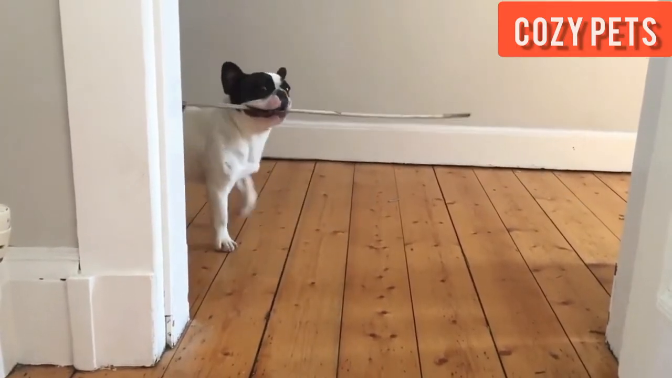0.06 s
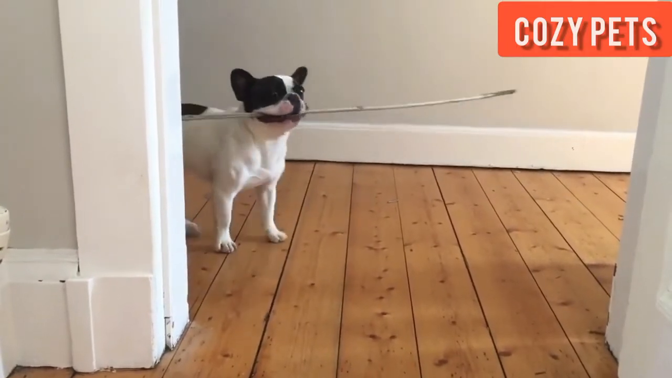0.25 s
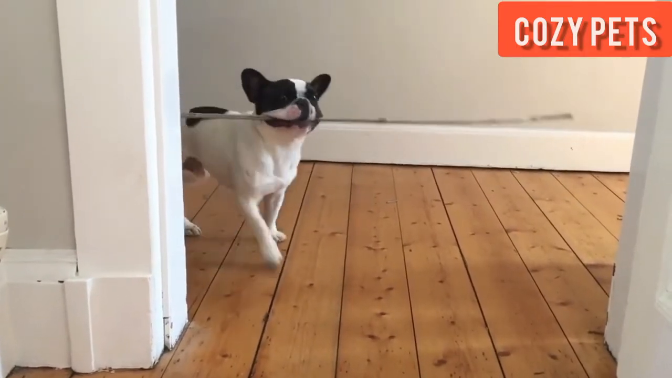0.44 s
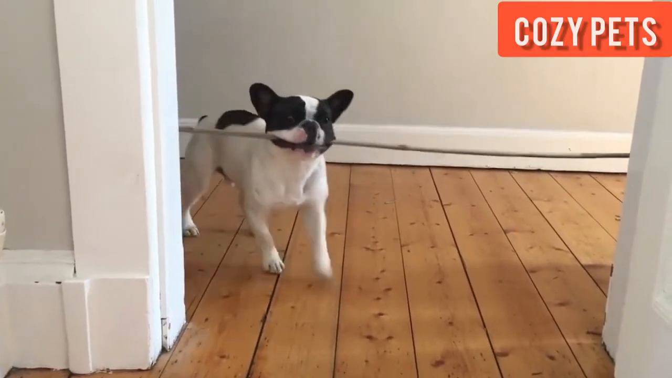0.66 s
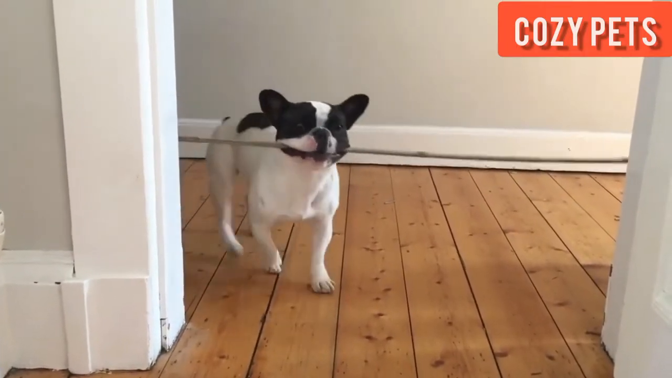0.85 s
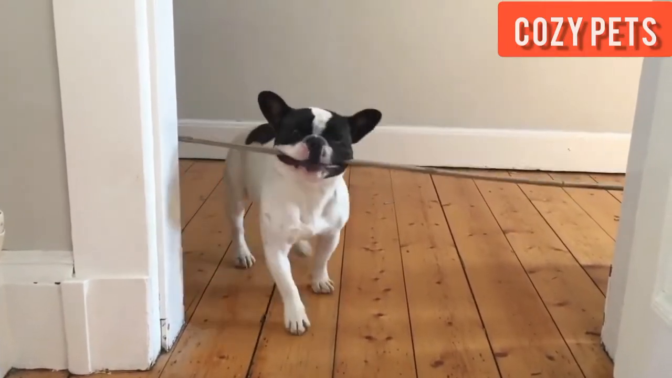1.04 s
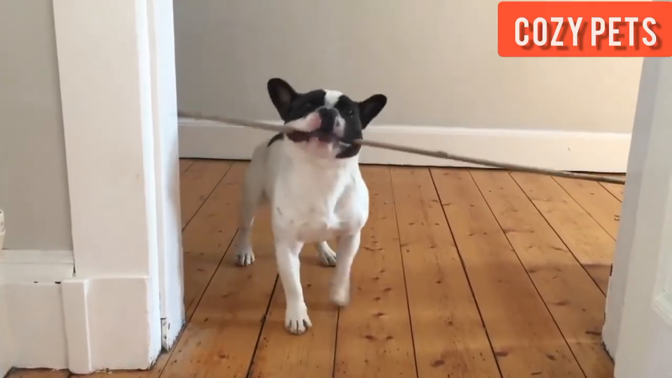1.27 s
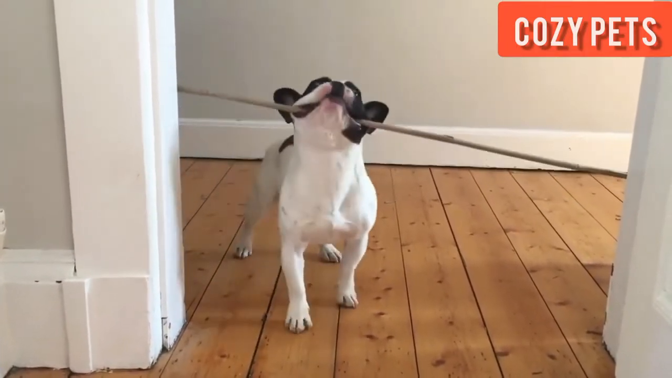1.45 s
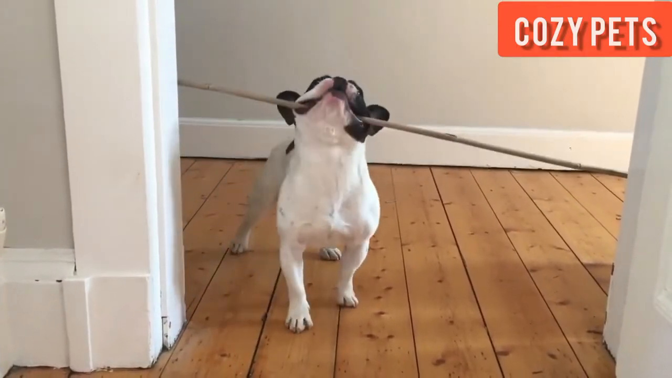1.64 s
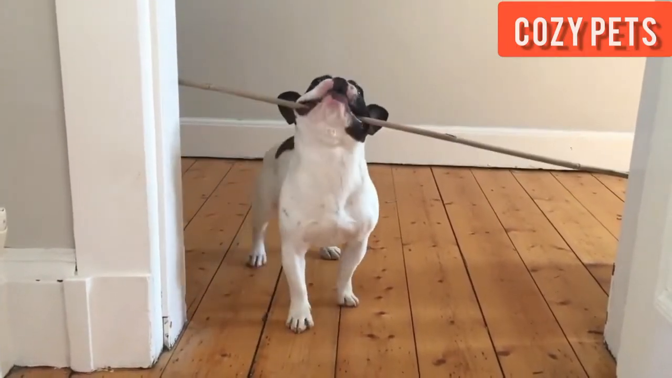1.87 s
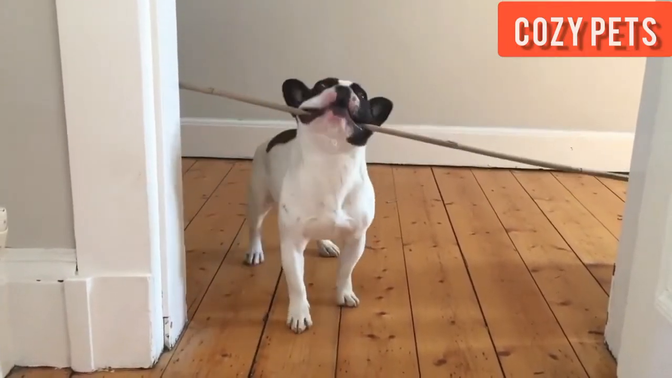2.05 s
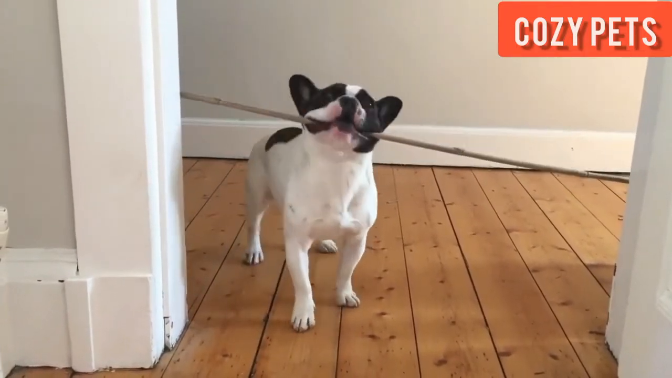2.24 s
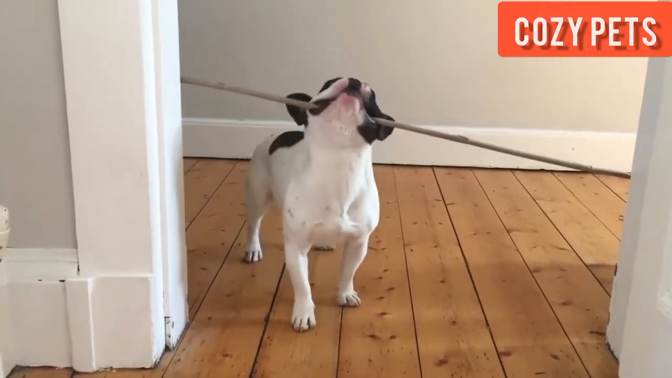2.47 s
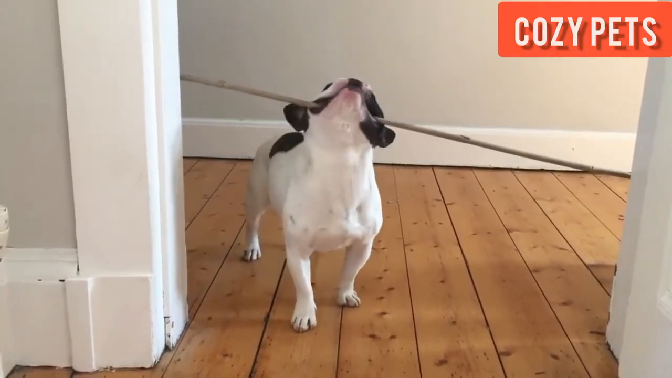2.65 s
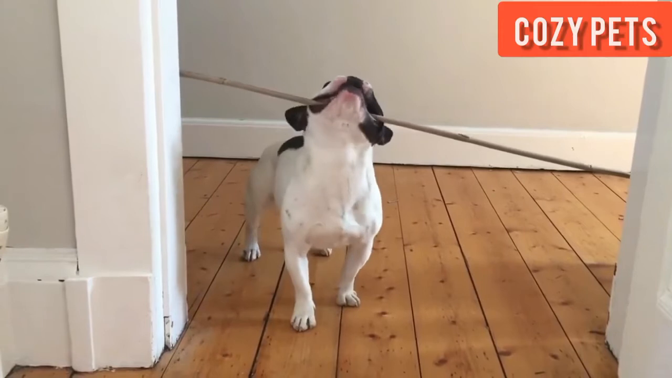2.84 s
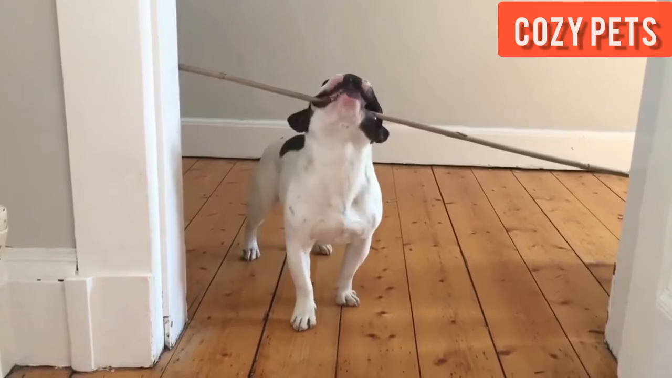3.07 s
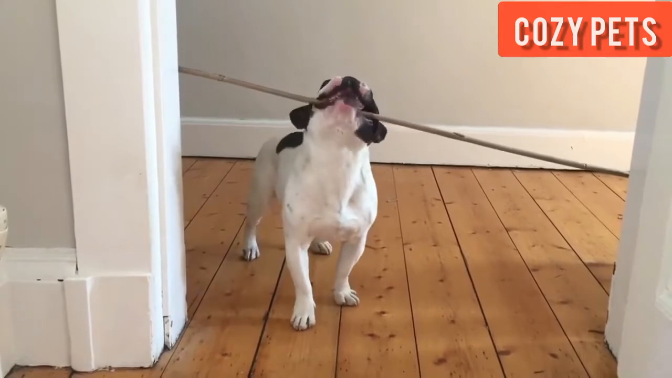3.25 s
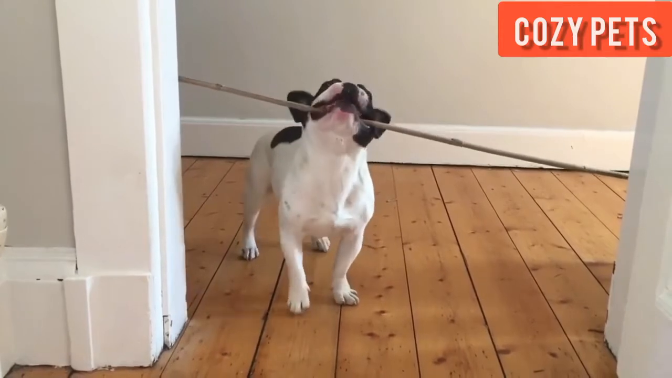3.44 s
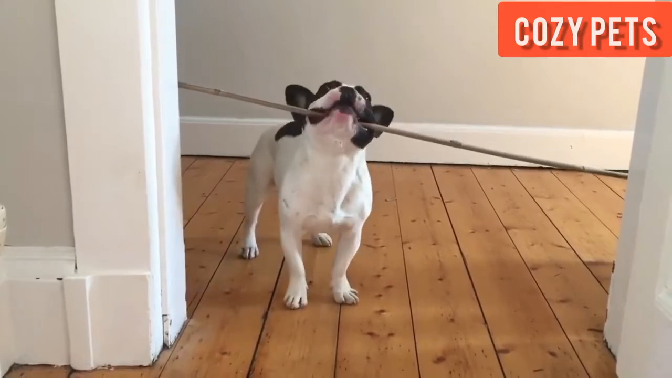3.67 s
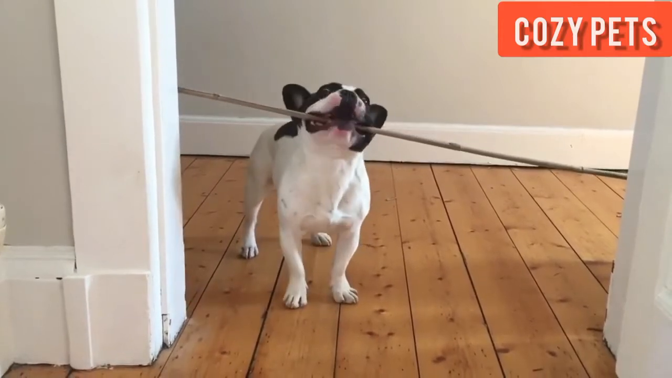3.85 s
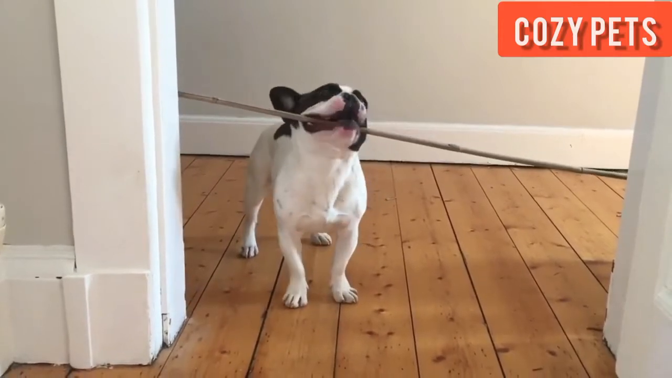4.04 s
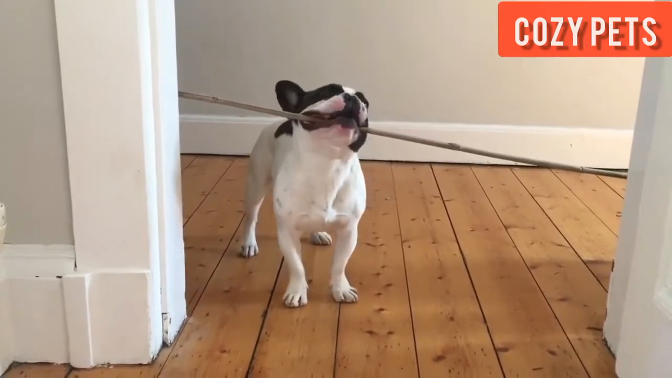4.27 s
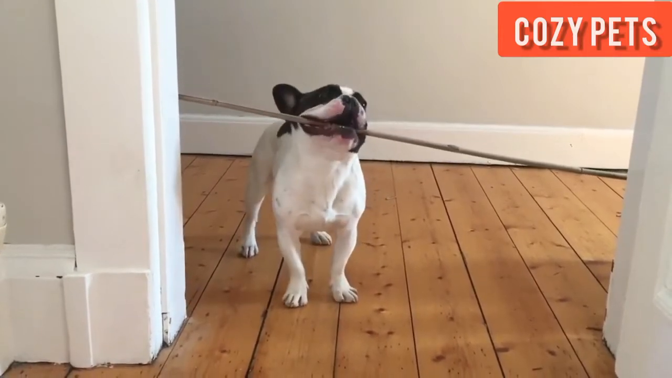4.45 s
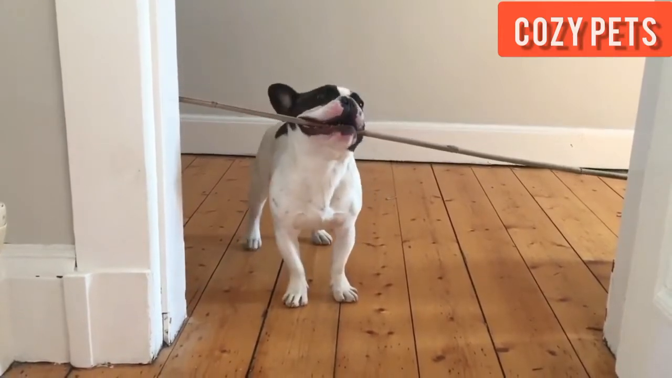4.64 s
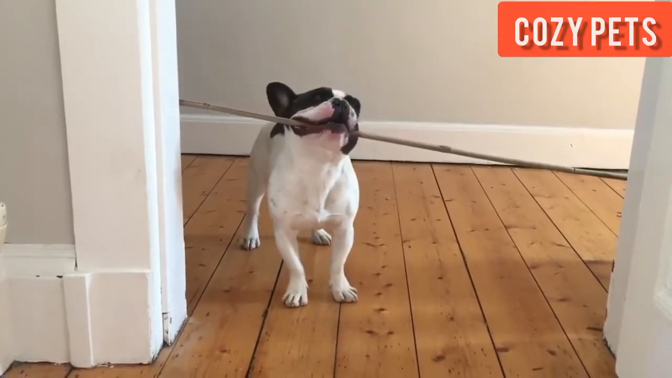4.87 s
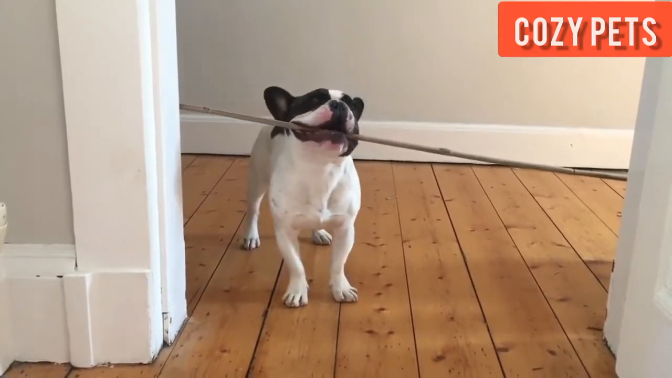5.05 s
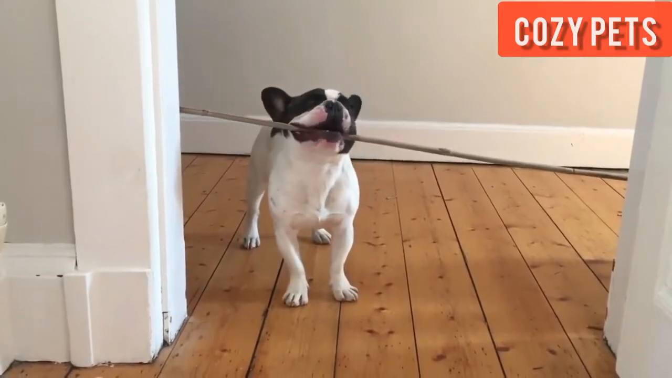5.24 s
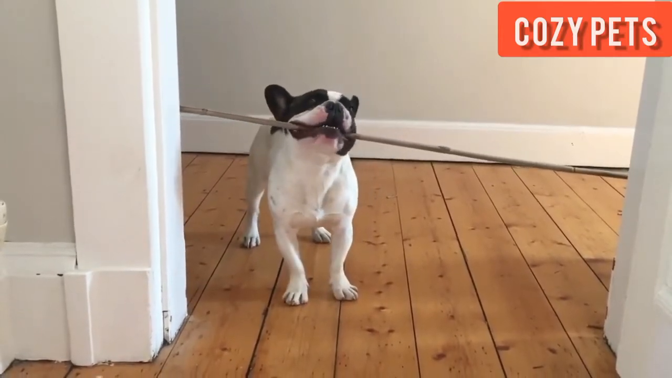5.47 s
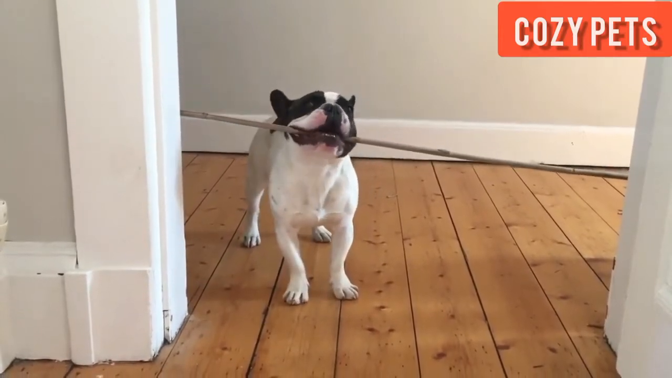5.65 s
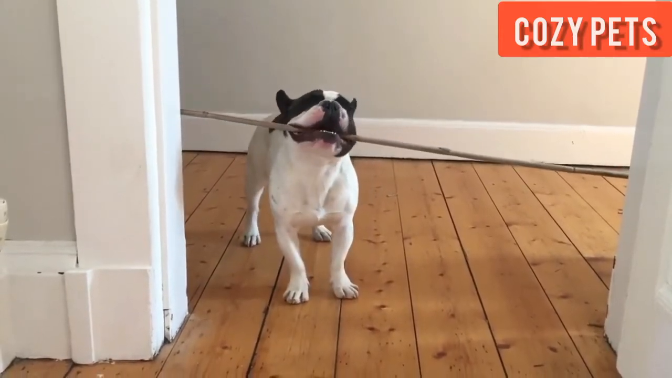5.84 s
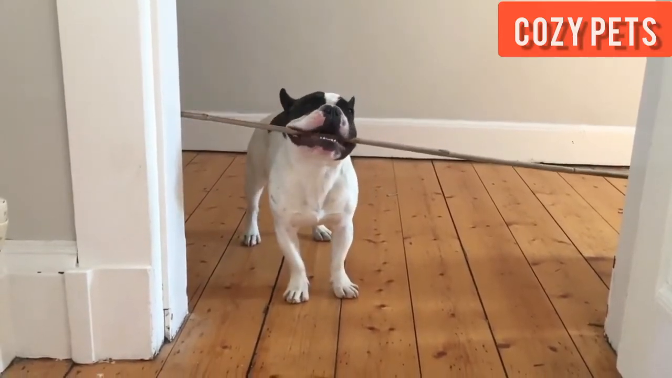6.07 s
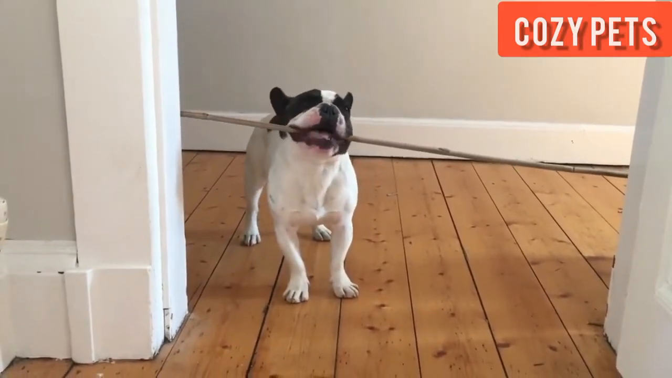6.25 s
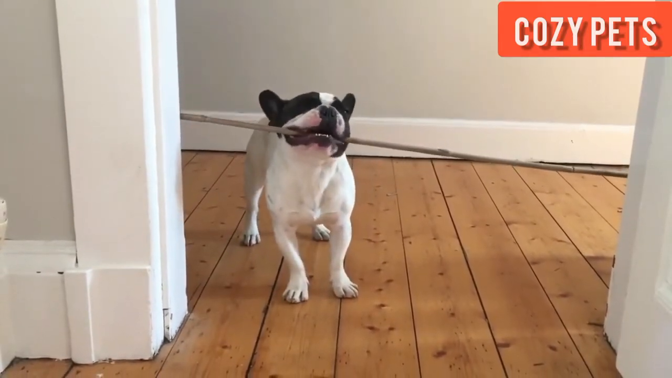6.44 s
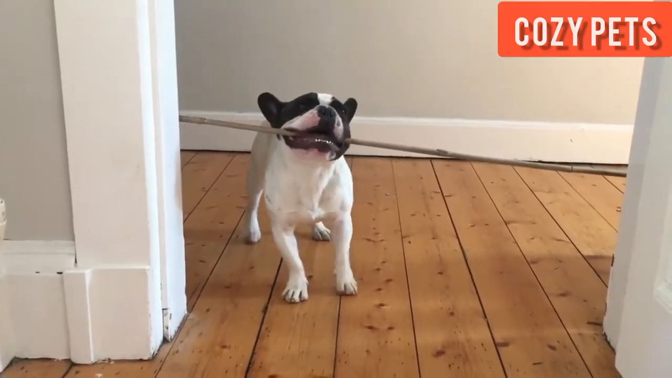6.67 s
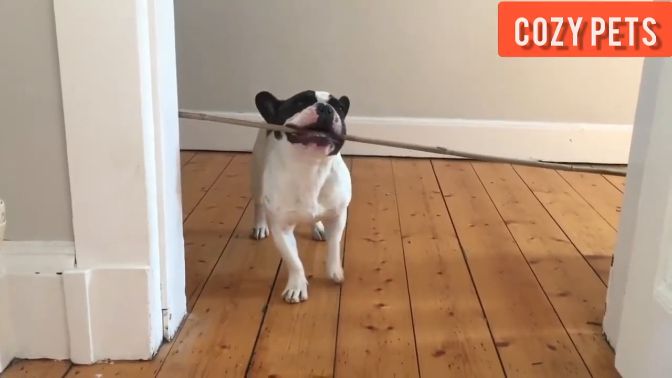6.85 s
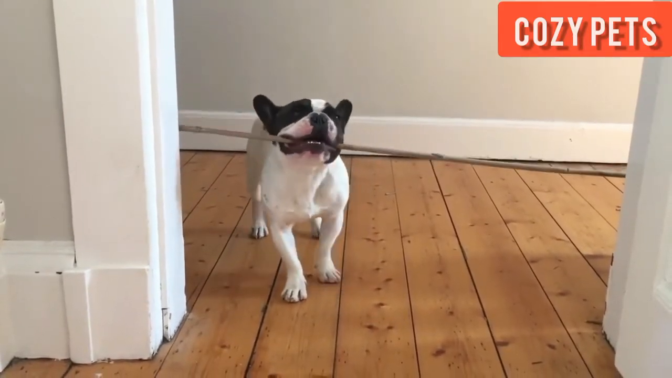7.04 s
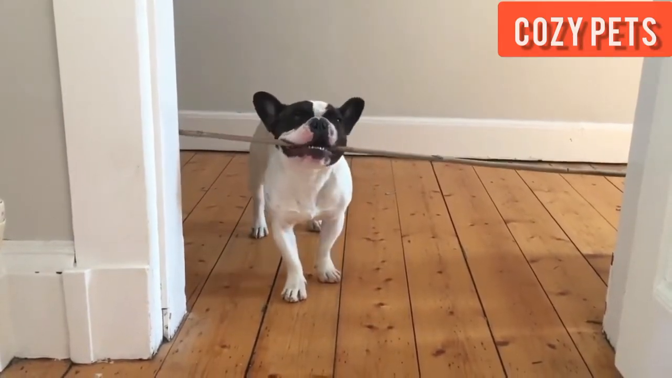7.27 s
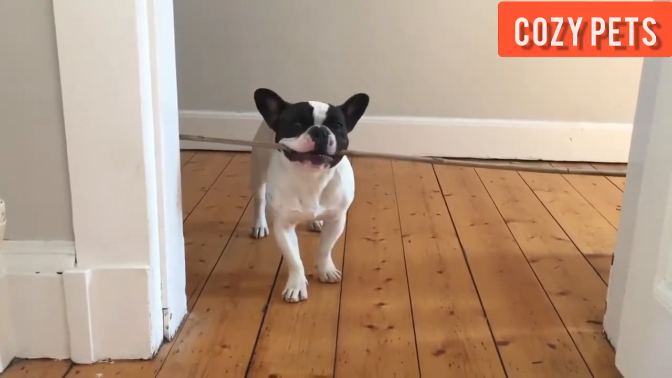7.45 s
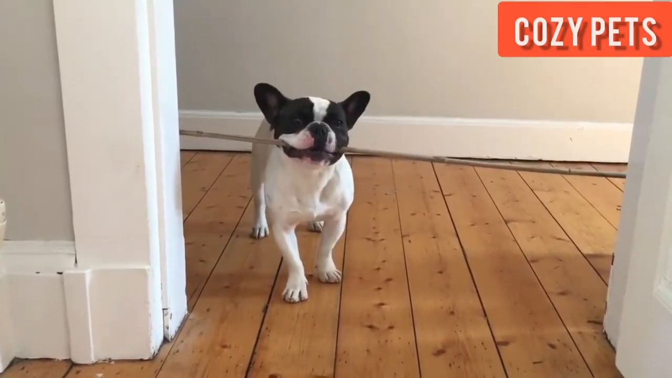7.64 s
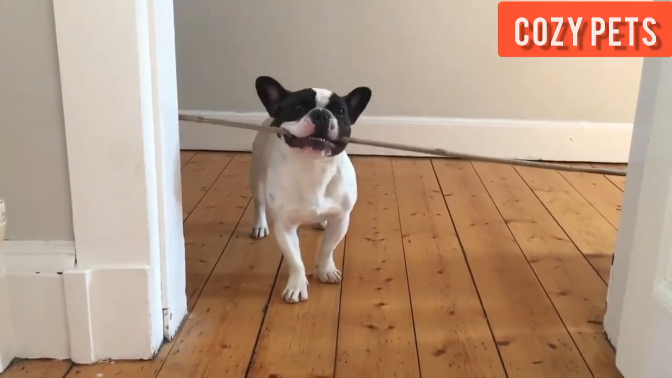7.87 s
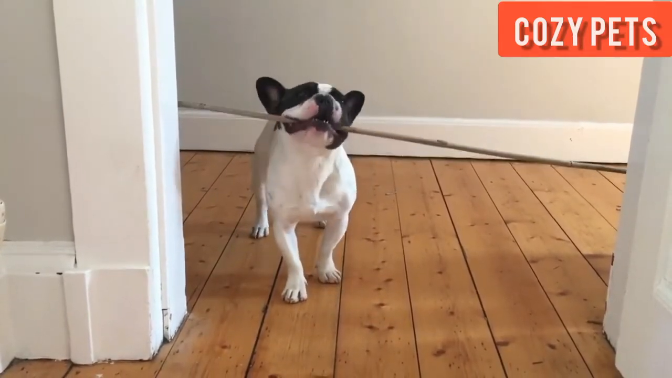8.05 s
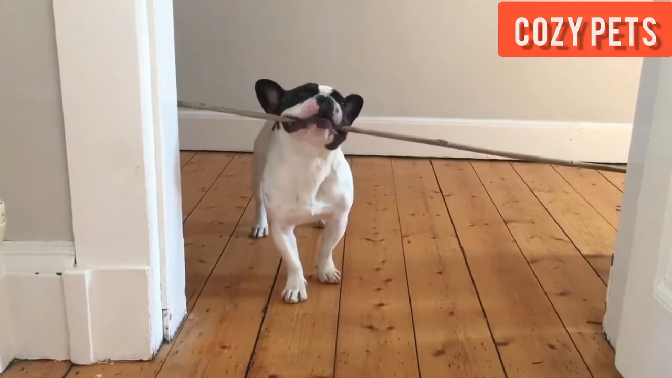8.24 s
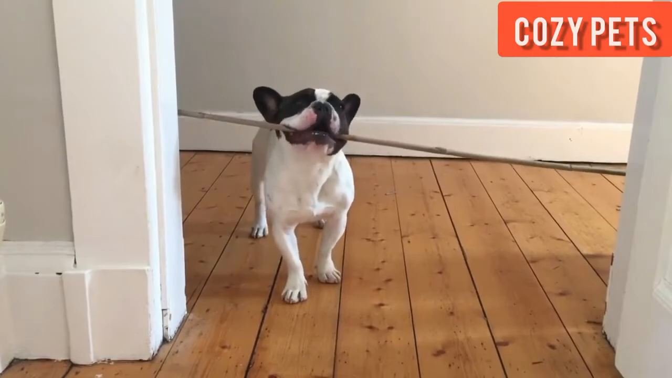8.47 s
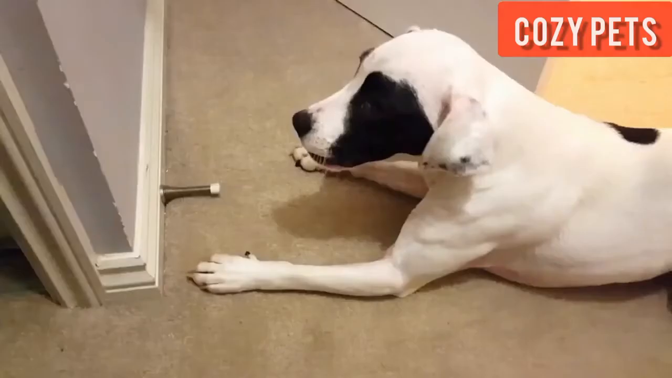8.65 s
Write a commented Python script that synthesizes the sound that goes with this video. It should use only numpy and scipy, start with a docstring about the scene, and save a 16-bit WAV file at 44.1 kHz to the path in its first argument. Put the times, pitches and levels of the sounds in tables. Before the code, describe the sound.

A small dog huffs and ticks across bare boards, its long stick smacks hard into a door frame, then sharp wood cracks ring in an empty room.

```python
"""A small dog huffs and carries a long stick over bare floorboards: claws tick, paws thud, the stick scrapes.
It swings hard into a door frame; then the dog stands and chews: wood cracks and splinters, the jaw clunks.
Blows are noise bursts with ringing stick modes; huffs are fluttering noise through muzzle resonances;
scrapes and splinters are filtered grains; clunks and thuds are decaying sines. Floor modes boom under
the weight, and decaying noise makes the empty room ring around one microphone."""
import sys
import numpy as np
from scipy import signal
from scipy.fft import rfft, irfft
from scipy.io import wavfile

SR = 44100
rng = np.random.default_rng(int(sys.argv[2]) if len(sys.argv) > 2 else 0)


def inscribe(sig):
    """Save sig as 16-bit PCM at rate SR to the path in sys.argv[1].

    A 1-D sig is mono; a 2-D sig holds one channel per row.
    Samples are clipped to [-1, 1] before scaling.
    """
    pcm = np.round(np.clip(np.atleast_2d(sig).T, -1, 1) * 32767)
    wavfile.write(sys.argv[1], SR, pcm.astype(np.int16))


N = 384111

# ringing modes of the stick: pitch_hz, level_db
STICK_MODES = [(620, -10.5), (950, -15.5), (1300, -12.5), (1720, -0.5), (2250, -7.5), (2620, -1), (2900, 2),
               (3780, -10), (4700, -17), (5500, -2.5)]
# low modes of the floorboards: pitch_hz, width_hz
FLOOR_MODES = [(55, 42), (86, 5.9)]


def from_db(db):
    """Decibels to gain."""
    return 10 ** (np.asarray(db) / 20)


def rms_one(x):
    """Scale to rms 1."""
    return x / np.sqrt(np.mean(x ** 2) + 1e-20)


def envelope(rows, attack_share, sag_db, release_t60_s):
    """Gain of bursts (start_s, length_s, level_db): each rises over a share of its length, sags, then dies."""
    gain = 0
    for start_s, length_s, level_db in rows:
        t = np.arange(N) / SR - start_s
        sag = sag_db * np.clip(t / length_s, 0, 1)
        release = 60 * np.maximum(t - length_s, 0) / release_t60_s
        rise = np.clip(t / (attack_share * length_s), 0, 1) ** 2
        gain = gain + rise * from_db(level_db - sag - release)
    return gain


def band(x, low_hz, high_hz):
    """Band-pass, its top edge kept below the Nyquist limit."""
    edges = [low_hz, min(high_hz, .45 * SR)]
    return signal.sosfilt(signal.butter(2, edges, "band", fs=SR, output="sos"), x + 1e-18)


def coloured(x, points):
    """Filter x along a curve of (pitch_hz, level_db) points; rms 1."""
    hz = np.maximum(np.fft.rfftfreq(len(x), 1 / SR), 1)
    knots, db = np.transpose(points)[:2]
    gain = from_db(np.interp(np.log(hz), np.log(knots), db))
    return rms_one(irfft(rfft(x) * gain, len(x)))


def resonance(x, hz, width_hz):
    """Two-pole resonance of gain 1 on top."""
    r = np.exp(-np.pi * width_hz / SR)
    zeros = [(1 - r * r) / 2, 0, (r * r - 1) / 2]
    poles = [1, -2 * r * np.cos(2 * np.pi * hz / SR), r * r]
    return signal.lfilter(zeros, poles, x + 1e-18)


def drift(cutoff_hz):
    """Random wander of spread 1: noise low-passed at cutoff_hz."""
    low_pass = signal.butter(2, cutoff_hz, fs=SR, output="sos")
    return rms_one(signal.sosfilt(low_pass, rng.standard_normal(N + SR))[SR:])   # skip the settling


def grains(per_s, spread_db):
    """Random clicks of uneven size whose wandering rate, around per_s, makes clumps."""
    sizes = from_db(spread_db * np.minimum(rng.exponential(1, N), 5)) * rng.choice([-1, 1], N)
    return sizes * (rng.random(N) < per_s * from_db(4 * drift(50)) / SR)


def add(track, start_s, sound):
    """Mix a short sound in at start_s."""
    i = int(start_s * SR)
    track[i:i + len(sound)] += sound[:N - i]


def blow(level_db, parts, hold_s, burst_t60_s, ring_db, near_hz, focus_db):
    """Jagged contact noise and stick modes, split into parts (low_hz, high_hz, level_db) of set peak level.

    The place of the blow favours modes around near_hz: others lose focus_db per octave of distance."""
    stick_t60_s = 0.026   # at 1 kHz; higher modes die sooner
    stick_bend = .05   # each grip shifts the modes by about this share
    t = np.arange(int(.15 * SR)) / SR
    swell = np.minimum(t / 0.0028, 1) ** 2   # the contact builds up over a few ms
    rings = 0
    for hz, mode_db in STICK_MODES + [(near_hz, 1.5)]:
        bend, turn, share = rng.normal(size=3)
        favoured_db = mode_db + 2.5 * share - focus_db * abs(np.log2(hz / near_hz))
        decay = from_db(favoured_db - 60 * t * np.sqrt(hz / 1000) / stick_t60_s)
        rings = rings + decay * np.sin(2 * np.pi * hz * (1 + stick_bend * bend) * t + 2 * turn)
    burst = rng.standard_normal(len(t)) * from_db(-60 * np.maximum(t - hold_s, 0) / burst_t60_s)
    contact = swell * (burst + from_db(ring_db) * rings)
    out = 0
    for low_hz, high_hz, part_db in parts:
        shaped = band(band(contact, low_hz, high_hz), low_hz / 9.2, high_hz * 0.95)
        out = out + from_db(part_db) * shaped / np.abs(shaped).max()
    return from_db(level_db) * out


def still_room():
    """Steady coloured noise of the quiet room, its level wandering a little."""
    # spectrum of the quiet: pitch_hz, level_db (relative)
    quiet_curve = [(18, -28), (30, -2), (77, 1.5), (120, -15.5), (161, -20), (287, -14), (486, -21.5),
                   (1760, -23.5), (3980, -26.5), (13700, -36.5), (16000, -34.5)]
    quiet_db = -67
    return coloured(rng.standard_normal(N), quiet_curve) * from_db(quiet_db) * from_db(1.5 * drift(4.2))


def room(x):
    """Dense reflections: noise dying at its own rate in each half octave; two patterns blend as the dog moves."""
    # reverberation of the empty room: pitch_hz, t60_s, level_db (relative)
    reverb = [(150, 0.64, -9.5), (405, 0.41, 0.5), (980, 0.42, 2), (2540, 0.41, 0.5), (5900, 0.44, -5),
              (13900, 0.13, 5)]
    room_db, shift_cutoff_hz = -1.5, 40
    t, tail = np.arange(SR) / SR, 0
    knots, t60_s, level_db = np.transpose(reverb)
    for low_hz in 90 * 2 ** np.arange(0, 7.6, .5):
        centre = np.log(low_hz * 1.19)
        decay_s = np.interp(centre, np.log(knots), t60_s)
        fade_db = np.interp(centre, np.log(knots), level_db) - 60 * t / decay_s
        tail = tail + band(rng.standard_normal((2, SR)), low_hz, low_hz * np.sqrt(2)) * from_db(fade_db)
    # the door frame and floor answer first and loudest
    tail = tail * np.minimum(t / 0.0033, 1) * (1 + 0.87 * np.exp(-t / 0.016))
    one, other = (signal.fftconvolve(x, each / np.sqrt(np.sum(each ** 2)))[:N] for each in tail)
    blend = 2 * drift(shift_cutoff_hz)
    return from_db(room_db) * (np.cos(blend) * one + np.sin(blend) * other)


def boards():
    """Restless weight keeps the boards murmuring: noise excites two floor modes in irregular lumps."""
    # level curve of the boom: time_s, level_db
    boom_curve = [(0, -90), (0.798, -52), (2.498, -67), (3.999, -61.5), (6.498, -60.5), (7.201, -54),
                  (8.71, -57.5)]
    lumps = from_db(drift(1.0) + np.interp(np.arange(N) / SR, *np.transpose(boom_curve)))
    murmur = 0
    for hz, width_hz in FLOOR_MODES:
        push = rng.standard_normal(N)
        murmur = murmur + resonance(resonance(push, hz, width_hz), hz, width_hz)
    return lumps * rms_one(murmur)


def thuds():
    """Paws and weight land: a quick swell, then a floor tone beating with a second one under a dull rustle."""
    # landings on the floorboards: start_s, level_db, pitch_hz
    landings = [(0.65, -46, 94.8), (0.803, -43, 76.6), (1.048, -40.5, 91), (1.247, -26.5, 61.6),
                (1.291, -28, 83.2), (1.341, -32.5, 50.5), (1.417, -33.5, 80.1), (1.62, -41, 73.4),
                (1.697, -43.5, 83.2), (1.996, -47.5, 112), (2.071, -44, 57), (2.966, -49, 92.6),
                (3.369, -35.5, 68.8), (3.486, -34.5, 55.9), (3.597, -41.5, 86.1), (4.687, -50, 93),
                (5.01, -46, 87.7), (5.691, -38, 55)]
    out, t = np.zeros(N), np.arange(int(.5 * SR)) / SR
    modes_sum_hz = sum(mode_hz for mode_hz, width_hz in FLOOR_MODES)
    swell = from_db(-60 * t / 0.36) * (1 - np.exp(-t / 0.005))
    for start_s, level_db, hz in landings:
        rustle = from_db(-17) * rms_one(band(rng.standard_normal(len(t)), 36, 240))
        ring = np.sin(2 * np.pi * hz * t)
        other = from_db(-6) * np.sin(2 * np.pi * (modes_sum_hz - hz) * t)
        add(out, start_s, from_db(level_db) * swell / swell.max() * (ring + other + rustle))
    return out * from_db(1.9 * drift(7.3))   # the level wanders


def huffs():
    """Air fluttering past soft tissue in uneven pulses, through the resonances of a short muzzle."""
    # huffs and snorts: start_s, length_s, level_db, pitch_ratio, width_ratio (both of the muzzle)
    breaths = [(-.05, 0.24, -57.5, 0.785, 0.52), (0.21, 0.089, -56, 0.67, 6.3),
               (1.414, 0.35, -51.5, 0.882, 2.7), (2.592, 0.13, -59.5, 0.904, 1.9),
               (3.533, 0.17, -50.5, 0.95, 1.7)]
    # resonances of the muzzle: pitch_hz, width_hz, level_db
    muzzle = [(907, 62, 19.5), (1740, 76, 26.5), (2555, 15, 14), (3240, 290, 13.5), (4230, 35, -16)]
    pulses_per_s = 45 * from_db(3.7 * drift(8.93))   # wanders around 45
    flutter = np.sin(2 * np.pi * np.cumsum(pulses_per_s) / SR)
    air, out = rng.standard_normal(N) * from_db(5.5 * flutter), 0
    for start_s, length_s, level_db, pitch, wide in breaths:
        shaped = 0
        for k, (hz, width_hz, mode_db) in enumerate(muzzle):   # neighbours have opposite signs
            shaped = shaped + (-1) ** k * from_db(mode_db) * resonance(air, hz * pitch, width_hz * wide)
        gain = envelope([(start_s, length_s, level_db)], attack_share=0.18, sag_db=9, release_t60_s=0.057)
        out = out + rms_one(band(shaped, 750, 14000)) * gain
    return out


def scrapes():
    """Stick scraping and rattling: dull grains excite its modes and two lower ones, damped by the contact."""
    # scrapes on wood: start_s, length_s, level_db
    rubs = [(.98, 0.077, -46.5), (1.11, 0.31, -36), (1.99, 0.023, -41.5), (3.36, 0.54, -68.5),
            (6.6, 0.15, -49.5), (7.17, 0.19, -41.5), (7.76, 0.12, -43)]
    clicks, body = grains(per_s=600, spread_db=4.5), 0
    for hz, mode_db in STICK_MODES + [(391.0, -9.0), (172, -19.5)]:
        tilted_db = mode_db + 5.28 * np.log2(800 / hz)   # favours the lower modes
        body = body + from_db(tilted_db) * resonance(clicks, hz, 0.15 * hz)
    gain = envelope(rubs, attack_share=0.035, sag_db=19.8, release_t60_s=0.29)
    return rms_one(band(body, 130, 1400)) * gain


def splinters():
    """Dense bright grains of tearing fibre."""
    # bursts of tearing: start_s, length_s, level_db
    tears = [(.98, 0.13, -53.5), (1.15, 0.35, -57), (4.3, 0.071, -62.5), (4.87, 0.13, -60),
             (5.53, 0.061, -49.5), (6.6, 0.023, -39.5), (7.21, 0.067, -34), (8.27, 0.25, -48.5)]
    # colour of tearing fibre: pitch_hz, level_db (per Hz, relative)
    tearing_curve = [(1180, -47), (2000, -12.5), (6040, 1.5), (9330, -11.5), (14900, -12.5), (16000, -23.5)]
    gain = envelope(tears, attack_share=0.39, sag_db=3.6, release_t60_s=0.39)
    return coloured(grains(per_s=1500, spread_db=2.0), tearing_curve) * gain


def clunks():
    """Jaw on stick, a soft contact: low modes swell over a few cycles, then die; faint ones come at random."""
    # hollow clunks: start_s, level_db, pitch_hz
    bites = [(1.091, -33, 293), (1.153, -28, 346.5), (2.005, -48, 320), (2.643, -51.5, 289),
             (4.2, -43, 283.5), (4.275, -54, 402), (4.418, -48, 271), (4.809, -45, 290), (4.985, -54, 261),
             (5.405, -51, 267), (5.605, -41, 287), (5.663, -27.5, 283.5), (6.022, -43.5, 302),
             (6.501, -48, 275), (6.627, -34.5, 288), (7.184, -33.5, 292), (7.239, -34.5, 273),
             (7.758, -40, 295.4), (7.813, -42, 359), (7.995, -55, 330), (8.116, -51, 330),
             (8.34, -36.5, 298)]
    # modes of the jaw: pitch_ratio, level_db, t60_s
    jaw_modes = [(1, 1, 0.079), (2.3, -9.5, 0.015), (0.71, -13.5, 0.086), (1.9, -13, .04)]
    out, t = np.zeros(N), np.arange(int(.2 * SR)) / SR
    # faint clunks while the dog chews
    faint = [(4.3 + 4.3 * when, -64 + 11 * size, 230 + 170 * pitch) for when, size, pitch in rng.random((30, 3))]
    for start_s, level_db, hz in list(bites) + faint:
        modes = 0
        for ratio, mode_db, t60_s in jaw_modes:
            decay = from_db(mode_db + rng.normal(0, 3) - 60 * t / t60_s)
            modes = modes + decay * np.sin(2 * np.pi * hz * ratio * t)
        tap = band(rng.standard_normal(len(t)), 400, 1800) * from_db(-2.5 - 60 * t / 0.066)
        add(out, start_s - .006, from_db(level_db) * tap)   # teeth touch first
        body = modes * (1 - np.exp(-t / 0.0068)) ** 2
        add(out, start_s - .004, from_db(level_db) * body / np.abs(body).max())
    return out


def knocks():
    """Stick on frame and claws on boards: a woody band around the strongest ring, a tick above."""
    # stick and claws on wood: start_s, level_db, strongest_ring_hz
    contacts = [(0.48, -44.5, 2630), (0.51, -31.5, 2285), (0.561, -37, 1060), (0.717, -47.5, 1738),
                (0.984, -28, 1974), (1.031, -26, 2170), (1.094, -25.5, 920), (1.1155, -31, 1993),
                (1.428, -23.5, 1614), (1.889, -42, 2050), (1.993, -41, 639), (2.527, -47, 1585),
                (2.85, -41.5, 2120), (2.948, -40, 1670), (3.072, -45.5, 2980), (3.342, -51, 754),
                (3.527, -43, 1746), (3.828, -49, 1698), (6.257, -46, 2416), (6.927, -46.5, 1550),
                (7.087, -48.5, 1480), (7.176, -34, 1500), (7.214, -22.5, 1442), (7.759, -41.5, 1550),
                (7.787, -32.5, 2900), (8.034, -38.5, 2580), (8.269, -35, 1530)]
    tick_db = -17.5
    out = np.zeros(N)
    for start_s, level_db, hz in contacts:
        parts = [(hz / 2.4, hz * 2.35, 0), (4500, 12000, tick_db)]
        hit = blow(level_db, parts, hold_s=0.0018, burst_t60_s=0.05, ring_db=-.5, near_hz=hz, focus_db=12)
        add(out, start_s - .002, hit)   # leaves time for the swell
    return out


def frame_blow():
    """The stick swings hard into the door frame: a short burst over the stick's ring."""
    # bands of the blow: low_hz, high_hz, level_db
    frame_parts = [(1080, 3300, -1), (3200, 3900, -4.5), (5400, 10000, -5.5)]
    start_s, level_db = 1.1388, -6
    out = np.zeros(N)
    hit = blow(level_db, frame_parts, hold_s=0.0021, burst_t60_s=0.029, ring_db=-11, near_hz=1780, focus_db=1.0)
    add(out, start_s - .002, hit)
    return out


def cracks():
    """Snapping fibres, mostly between the teeth: short and bright, with the stick ringing under them."""
    # hard cracks of the stick: start_s, level_db, woody_part_db
    snaps = [(4.351, -45.5, -11), (4.3817, -40.5, -11.5), (4.9317, -37.5, -8), (4.9726, -31, -9.5),
             (5.5957, -14.5, -10), (5.6556, -5, -3.5), (6.5408, -31, -16), (6.569, -26, -8),
             (6.617, -15, -18.5), (6.6499, -15, -9.5), (7.236, -39, -2), (7.265, -26, -3.5),
             (7.284, -26.5, -10), (7.3038, -28, -11), (7.333, -43, -17), (7.402, -40.5, -10),
             (7.4367, -17.5, -12), (8.208, -41.5, -2), (8.29, -31.5, -12), (8.31, -29.5, -10),
             (8.3325, -12, -6), (8.3584, -17.5, -6.5), (8.4004, -16.5, -14), (8.4597, -19.5, -14)]
    top_db, wood_dulls = -8, 0.12   # top part of a crack; dB it loses per dB of woody part
    # one mode of the stick sings on after a woody crack
    long_ring_hz, long_ring_db, long_ring_t60_s = 1728, -22, 0.54
    out, t = np.zeros(N), np.arange(SR // 2) / SR
    for start_s, level_db, woody_db in snaps:
        parts = [(1060, 3050, woody_db), (4220, 7700, 0.002), (8420, SR / 2, top_db - wood_dulls * woody_db)]
        hit = blow(level_db, parts, hold_s=0.0043, burst_t60_s=0.015, ring_db=1.5, near_hz=2910, focus_db=0.5)
        add(out, start_s - .002, hit)
        # three close partials beat
        partials_hz = long_ring_hz * (1 + 0.017 * rng.normal()) * np.array([[.985], [1], [1.02]])
        decay = from_db(level_db + 2 * woody_db + long_ring_db - 60 * t / long_ring_t60_s)
        add(out, start_s, decay * np.sin(2 * np.pi * partials_hz * t).mean(axis=0))
    return out


def scene():
    """Everything reaches one microphone, so both channels are alike."""
    dog = knocks() + frame_blow() + cracks() + huffs() + splinters() + scrapes()
    jaw = clunks()
    echoes = room(dog + from_db(-2.5) * jaw)   # soft and low, the jaw gets less back from the walls
    mid = dog + jaw + echoes + thuds() + boards() + still_room()
    return np.array([mid, mid])


def record(dry):
    """The small microphone loses the deepest bass; the top is cut."""
    cutoff_hz = 16700
    thin = signal.sosfilt(signal.butter(3, 42, "high", fs=SR, output="sos"), dry)
    return signal.sosfilt(signal.cheby2(12, 60, cutoff_hz, fs=SR, output="sos"), thin)


dry = scene()
out = record(dry)
inscribe(out)
```